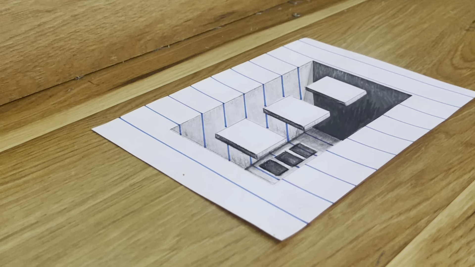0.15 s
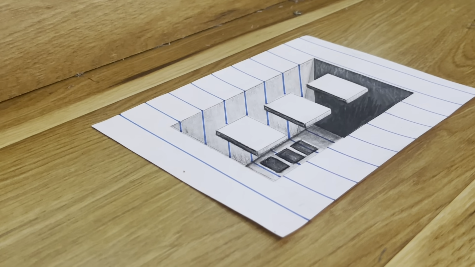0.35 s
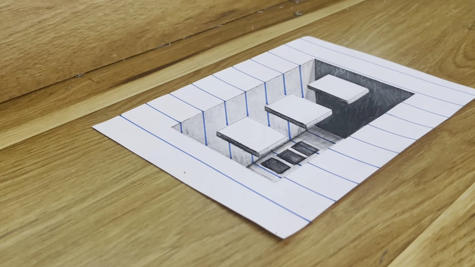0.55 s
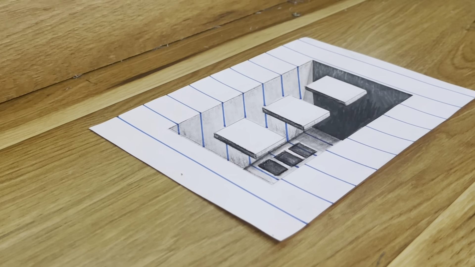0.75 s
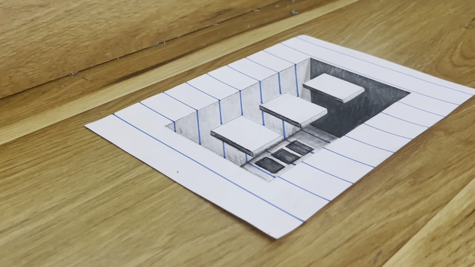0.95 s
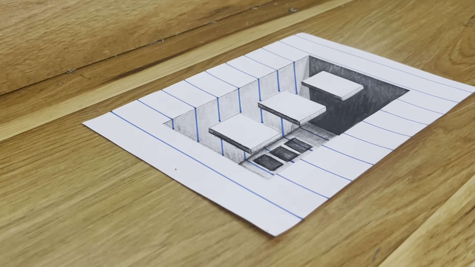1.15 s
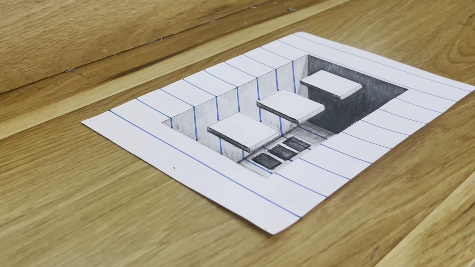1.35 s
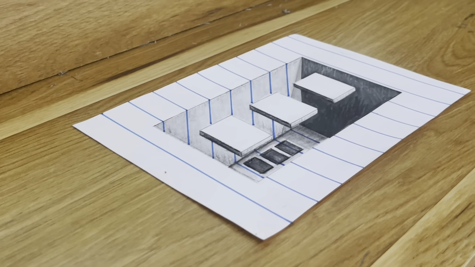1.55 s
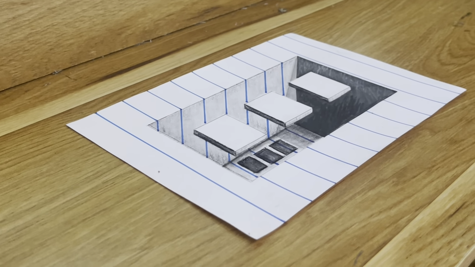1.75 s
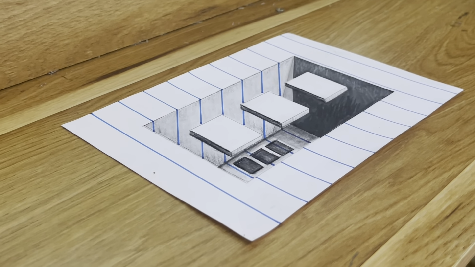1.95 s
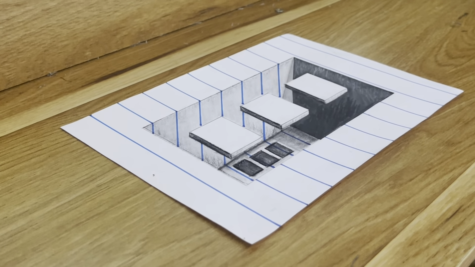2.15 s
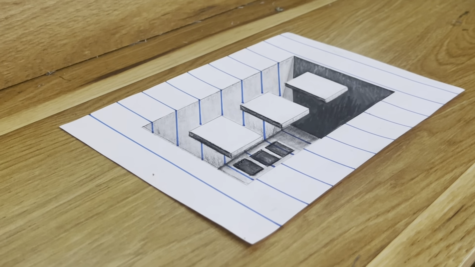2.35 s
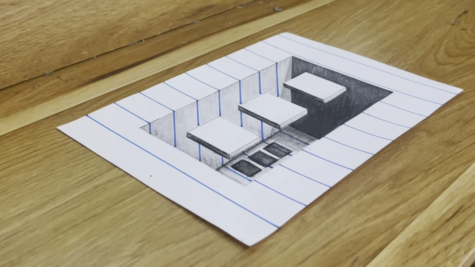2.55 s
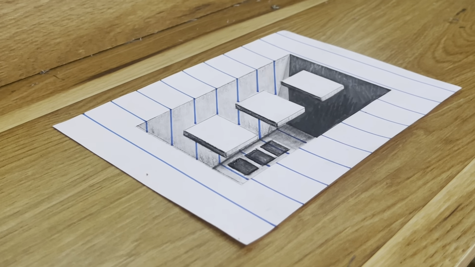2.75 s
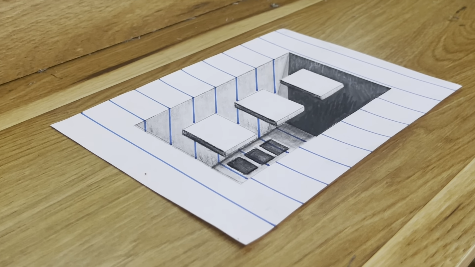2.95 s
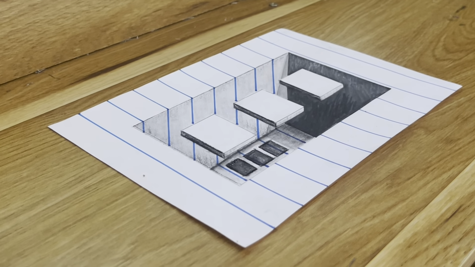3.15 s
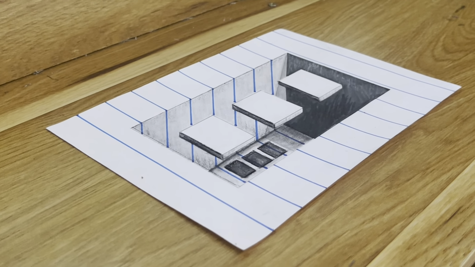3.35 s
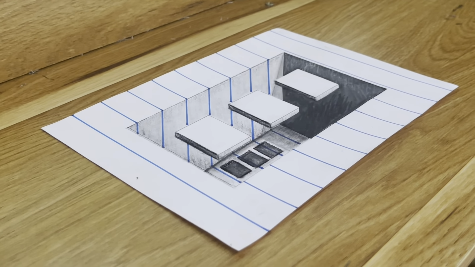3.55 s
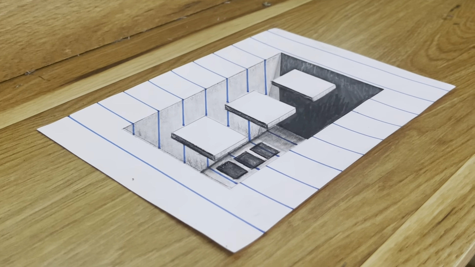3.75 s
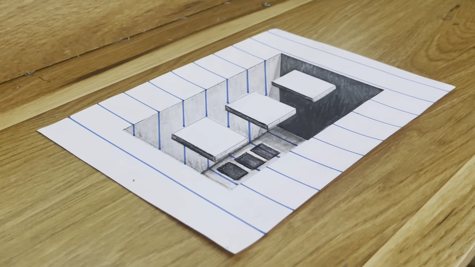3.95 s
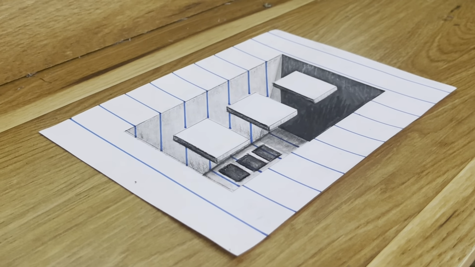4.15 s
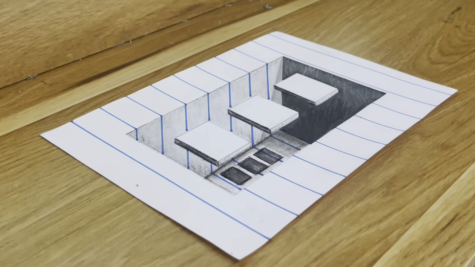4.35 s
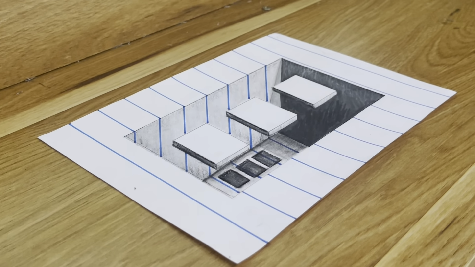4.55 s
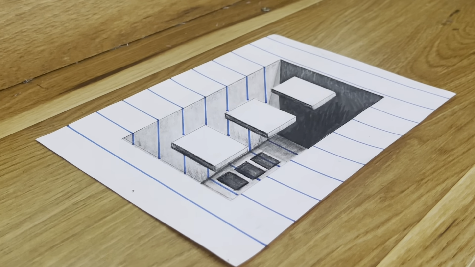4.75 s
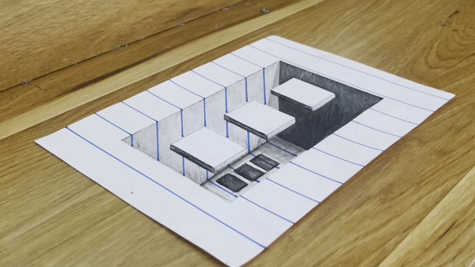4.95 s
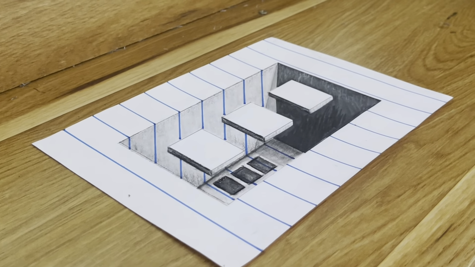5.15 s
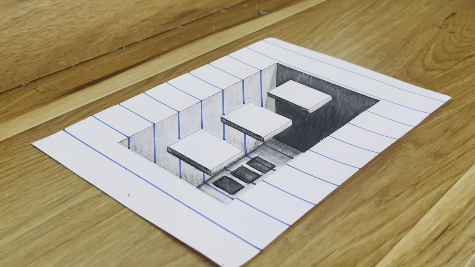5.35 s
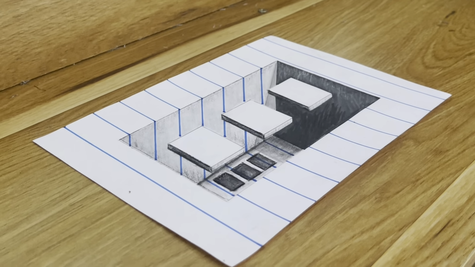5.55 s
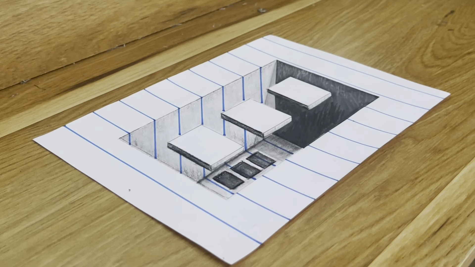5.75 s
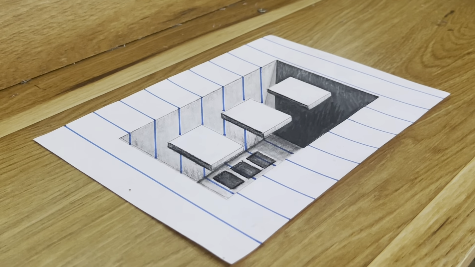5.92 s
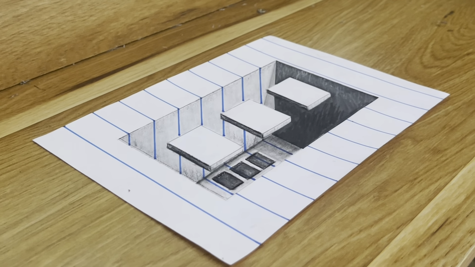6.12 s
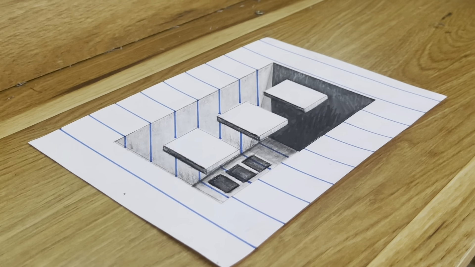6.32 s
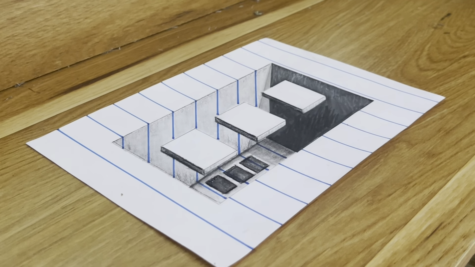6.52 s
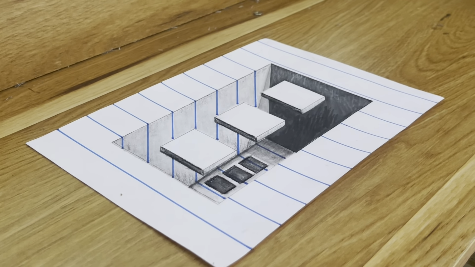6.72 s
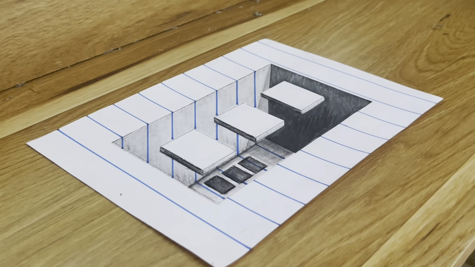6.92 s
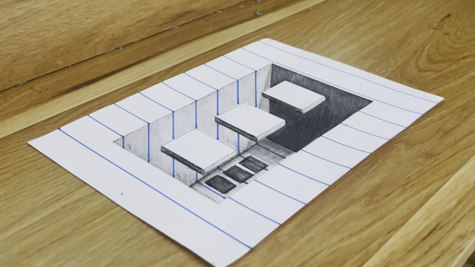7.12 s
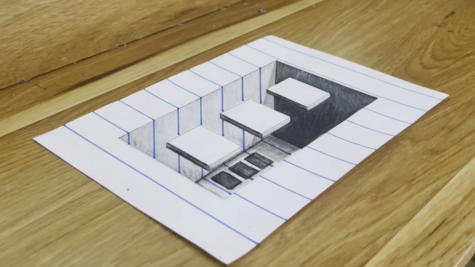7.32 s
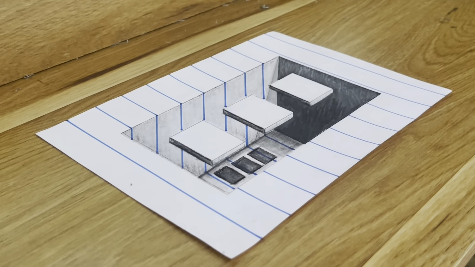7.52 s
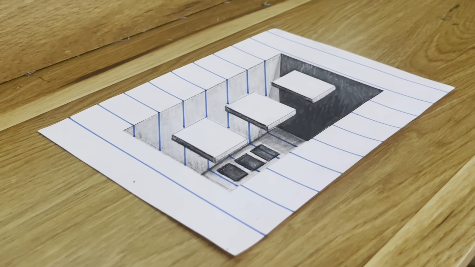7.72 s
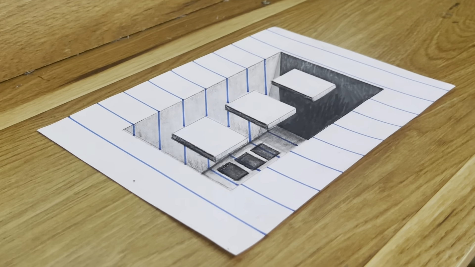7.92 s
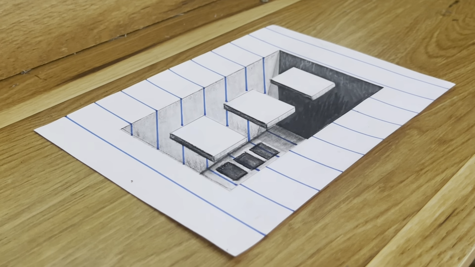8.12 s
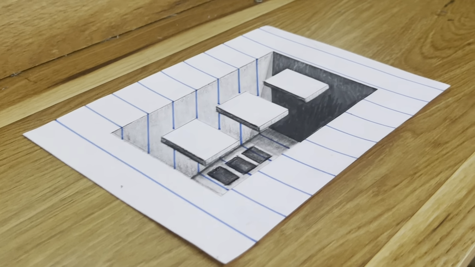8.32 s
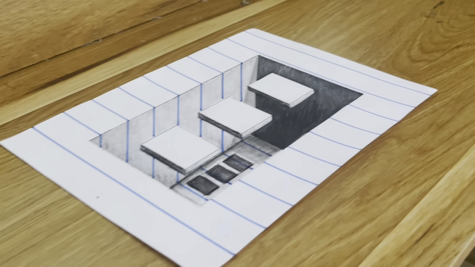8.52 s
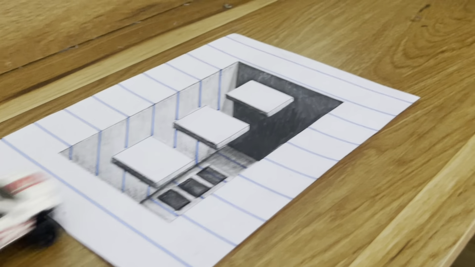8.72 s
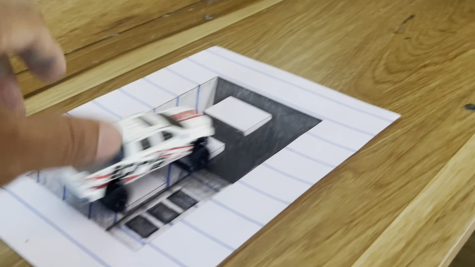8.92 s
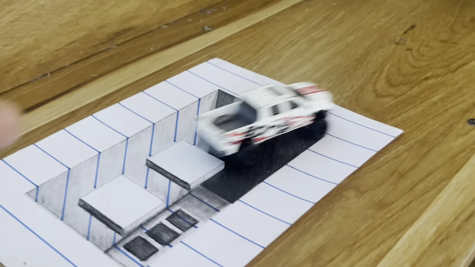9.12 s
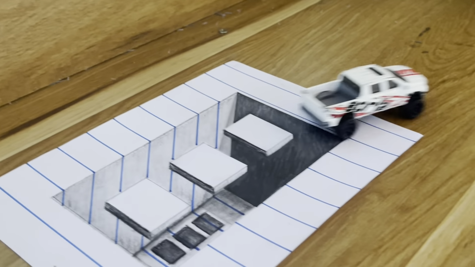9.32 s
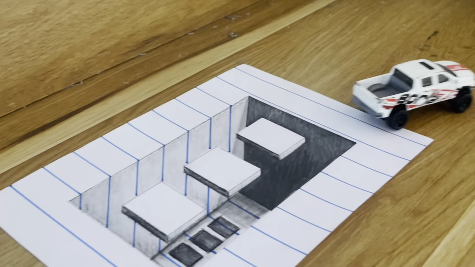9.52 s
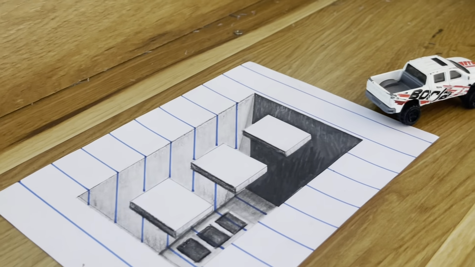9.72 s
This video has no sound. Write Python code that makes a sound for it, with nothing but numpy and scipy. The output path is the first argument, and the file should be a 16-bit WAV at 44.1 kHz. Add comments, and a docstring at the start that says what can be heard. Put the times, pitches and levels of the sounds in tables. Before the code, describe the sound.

Close stereo in a quiet, faintly humming room. After a near-silent start, a toy truck is rolled to and fro on a wooden table in short strokes: plastic whirr, axle ticks, hollow scuffs and soft low thumps. Strokes grow louder, with brief chirps, until one hard push releases the truck, which coasts ringing over paper, clatters onto wood and stops.

```python
"""A quiet room hums and hisses faintly throughout; both are shaped noise.
From 0.8 s a hand pushes a small toy truck to and fro over a wooden table, on the whole louder and louder.
Tiny bumps make its wheels whirr, its axles tick, and shaken modes of the table top drum; some wheels chirp or groan.
At 8.84 s the hand lets go: the truck coasts over paper, ringing freely, and leaves the paper at 9.24 s.
Near 9.6 s it stops and rings out faintly. The toy's shell colours its sound; all is heard close by in stereo."""
import sys
import numpy as np
from scipy import signal
from scipy.fft import rfft, irfft
from scipy.io import wavfile
from scipy.ndimage import uniform_filter1d

SR = 44100
rng = np.random.default_rng(int(sys.argv[2]) if len(sys.argv) > 2 else 0)


def to_wav(sig):
    """Store sig (one row per channel, or 1-D mono) as 16-bit WAV at the path in sys.argv[1].

    Samples outside -1..1 are clipped; the rate is SR.
    """
    pcm = np.clip(np.atleast_2d(sig), -1, 1) * 32767
    pcm = np.round(pcm).astype(np.int16)
    wavfile.write(sys.argv[1], SR, pcm.T)  # frames by channels


N = 435266
TIME, HZ = np.arange(N) / SR, np.fft.rfftfreq(N, 1 / SR)

# still room, shape of its noise: f/Hz, relative level per Hz/dB
HUSH = [(15, -29), (28, -20.5), (52, -3), (129, -9), (274, -25), (554, -28), (780, -35.5), (950, -43.5),
        (4100, -52), (12000, -52.5), (15000, -64.5)]
HUSH_DB = -64.5
# time for echoes to fall by 60 dB: f/Hz, t/s
ROOM_T60 = [(100, 0.63), (500, 0.35), (2000, 0.14), (6000, 0.13), (12000, 0.13)]
# clear knocks of wheels and loose axles: t/s, level/dB, hollow lows relative to level and before trim/dB,
#   bright snap relative to level/dB, pitch of the struck spot f/Hz
TICKS = [(0.793, -77, -1, -18, 2840), (0.8768, -67, -3, -8, 2060), (0.9337, -80, 9, -9.5, 1890),
         (1.0737, -62, -21, -20.5, 2050), (1.2463, -67, -24.5, -26, 1980), (1.336, -59, -25, -22, 1940),
         (1.345, -57.5, -24, -25, 2200), (1.377, -64, -20, -26, 1980), (1.422, -63, -16, -20, 1820),
         (1.4308, -58, -25, -26, 2040), (1.464, -56, -12, -20, 1980), (1.498, -66, -14, -18, 2050),
         (1.581, -57.5, -23, -21, 2180), (1.6714, -55, -11, -2, 2300), (1.7252, -57, -10, 4, 1580),
         (1.761, -51, -3, -4, 2100), (1.848, -57, -15, -24, 2150), (1.9, -54, -3, -14, 2150),
         (1.9876, -65, 7, -22, 2340), (2.1072, -58, -9, -13, 2070), (2.1296, -52, -10.0, 0.5, 1940),
         (2.226, -55.5, 2, -4, 2450), (2.362, -54, -2, -1.5, 2370), (2.5058, -71, 5, -8.0, 2260),
         (2.6214, -74, 8.5, -27, 1830), (2.755, -78, 6, -20, 1700), (2.7655, -76, 2, -18, 2430),
         (2.793, -70, -8.5, -17.0, 2240), (2.803, -65, -3, -5, 1670), (2.8643, -61.5, -7, 1.5, 6800),
         (2.9043, -63.5, -18, -4, 2480), (2.959, -68, -10, -9.0, 2430), (3.062, -57.5, -6, 1, 5600),
         (3.121, -56.5, 3, -1, 2450), (3.1385, -55, 0, 2.5, 5710), (3.1718, -48.5, -16, 3, 6900),
         (3.2112, -53, -5, -2, 2500), (3.3973, -59, -4, -2, 3190), (3.482, -52.5, -11, -3, 2500),
         (3.5527, -62, -10.5, -15, 2430), (3.6675, -60, -14, 4.5, 3190), (3.7047, -63, -11, -4, 2500),
         (3.73, -62.5, -21, -25, 2520), (3.813, -66.5, -15.5, -30.0, 2300), (3.904, -60, -5, -3, 3170),
         (4.0386, -65, 3, -21.5, 2280), (4.166, -57, -3, -26, 1870), (4.258, -61, -6, -10, 2520),
         (4.2964, -57, -4, -4, 2280), (4.3186, -54.5, -20, -0.5, 9300), (4.3434, -58.5, -3, -1, 2200),
         (4.382, -59, -6, 5.5, 7460), (4.3913, -53.5, -9, -6, 2370), (4.443, -60, -3, -1, 2500),
         (4.449, -66, -13, 9, 4970), (4.756, -55, -5, -2.5, 3270), (4.8365, -56.5, -16, -19, 3280),
         (4.8697, -56.5, -1.5, -2, 3550), (4.9098, -70.5, -7, 17, 8800), (4.9455, -59.5, 6.5, 4.5, 6750),
         (4.959, -58, 0, 0, 2620), (4.9776, -55, -12, -8, 2560), (5.0192, -55, -6, -5, 2420),
         (5.0574, -47.5, -3, -2, 2480), (5.0792, -67, -8, 17, 5560), (5.09, -46, -11, -0.5, 2690),
         (5.105, -54, -17, 4, 9000), (5.12, -48, -4, -7.0, 2690), (5.1287, -50.5, -3, 2, 2670),
         (5.148, -64, -10, 9, 5530), (5.171, -54.5, -5, -9, 2500), (5.1767, -48.5, -5.5, -7, 2180),
         (5.219, -60.5, -26, 5.5, 5430), (5.275, -61, -12, 0, 3230), (5.2779, -47.5, -17, 0, 5570),
         (5.329, -65, -12, 5, 9280), (5.351, -63, -5, 2, 3250), (5.375, -65, -14, 7, 7000),
         (5.4245, -54.5, 0, 2, 6700), (5.4545, -56, -7, 2, 5300), (5.4776, -59, -8, -1, 3250),
         (5.498, -52, -13, -10, 3600), (5.52, -51.5, -14, -2, 2500), (5.528, -49, -18, -5, 3250),
         (5.563, -49, -13, -1, 2330), (5.578, -45, -23, -6, 2380), (5.594, -39, -26, -11, 2330),
         (5.6108, -46.5, -26, -18.0, 2290), (5.6248, -46, -23.5, -11, 2350), (5.655, -51.5, -16, 0, 2400),
         (5.677, -55, -14, -9, 2400), (5.6858, -47.5, -21, -4, 2690), (5.7151, -55, -8, 5, 6240),
         (5.7306, -52.5, -3, -0.5, 3210), (5.7456, -48, -12, -17, 3280), (5.7646, -45.5, -13, -7, 3300),
         (5.8051, -60.5, -7.0, 0, 6800), (5.9088, -82, -14, -19.5, 2500), (5.9257, -54.5, -8, -8, 2350),
         (5.948, -50, -4, -2, 2000), (5.9573, -50, -2, -2, 2500), (5.993, -43.5, -9, 0, 3240),
         (6.008, -51.5, 0, 6, 8050), (6.018, -45.5, -10.5, -6, 3240), (6.079, -52, -15, 1, 2500),
         (6.102, -46, -12, 1, 5900), (6.118, -43, -25, -15, 3270), (6.138, -48.5, -17, 1, 3250),
         (6.146, -49, -14, -1, 2500), (6.165, -51, -16.0, 5, 3500), (6.1762, -43.5, -15, -7, 2370),
         (6.1907, -56, -10, 7.5, 7000), (6.212, -54, -17, -5, 2540), (6.2596, -62, -12, 3, 5710),
         (6.3142, -42.5, -8, -4.5, 3220), (6.348, -55, -8, -6, 2500), (6.368, -46.5, -6, 3, 2000),
         (6.401, -45.5, -5.5, -13, 3250), (6.4325, -47.5, -5, 2.5, 5700), (6.4734, -51, -14, -5, 2280),
         (6.506, -43.5, -7.5, -6.5, 2600), (6.539, -50, -14, 1, 3270), (6.5514, -48.5, -15, 10, 7750),
         (6.572, -52, -10, -2, 5600), (6.5814, -41, -15, 4.5, 9500), (6.597, -50, -12, 0, 5600),
         (6.6122, -43, -2.5, 6.5, 5600), (6.6255, -39, -4.5, -4, 2580), (6.642, -48, -12, 6, 9000),
         (6.6604, -37.5, -6.5, 1, 3120), (6.673, -56, -4.5, -3, 9400), (6.695, -40.5, -23, 4, 5550),
         (6.707, -53, -10, 8, 9100), (6.7263, -43.5, -10.0, 7.5, 5360), (6.743, -46.5, -2, 2, 7950),
         (6.763, -42, -7, -8, 2600), (6.769, -40, -13, 1.5, 7000), (6.781, -50, -15, 3, 9300),
         (6.8145, -44.5, -17, 4, 6000), (6.8263, -48, -12, -5, 2670), (6.8573, -50, -18, 6, 5840),
         (6.8693, -49.5, -3, -1, 2110), (6.9247, -49, -5.5, 5.0, 5600), (6.9573, -58.5, -3, 1, 3620),
         (6.9815, -63, -6, 5, 5900), (7.0746, -59.5, -8, 7, 5600), (7.1066, -82, -9, 19.5, 5860),
         (7.1287, -57, -8, -6, 2580), (7.1654, -46.5, -10, 0.5, 6830), (7.197, -45, -7, 2, 5740),
         (7.2233, -64, -3, 17.5, 7150), (7.241, -44, -10, 2, 3250), (7.2512, -39.5, -2.5, 0, 2720),
         (7.2966, -47, -10, -1, 3210), (7.387, -42.5, -5, -3, 2620), (7.4263, -42, -9, 1.5, 7900),
         (7.4428, -44.5, -9, -4, 2150), (7.4663, -41.5, -8, -7, 2580), (7.4969, -34.5, -9.5, -3.0, 3470),
         (7.5632, -41.5, -26, 1, 2370), (7.61, -41.5, -25, -22, 2350), (7.63, -47, -21, -5, 2400),
         (7.652, -39, -23, -6, 3210), (7.661, -57.5, -14, 16, 5750), (7.706, -45, -18, -3, 2150),
         (7.717, -47, -8, -17, 2300), (7.736, -42.5, -7, -16, 2330), (7.756, -45, -8, -8, 2390),
         (7.7757, -42, -2.5, -21, 2440), (7.8073, -39.5, -9.5, -18, 1880), (7.822, -42, -11, -5, 2380),
         (7.839, -41.5, -9, -18, 2090), (7.866, -46, -8, -21, 2560), (7.8946, -43.5, -2, -20, 2400),
         (7.91, -55, -9, -14, 2000), (7.9219, -51.5, -6, -20.5, 2020), (7.934, -60, -8, 0, 1870),
         (7.9653, -51.5, -1.5, -11, 2480), (8.0562, -55, -4, 1.5, 2160), (8.0673, -55, -12, -24, 2200),
         (8.081, -45.5, -9, 0, 2080), (8.1082, -46.5, -9.5, -11, 2490), (8.127, -44.5, -4, 2.5, 9050),
         (8.148, -45.5, 1, -3, 2500), (8.1682, -38.5, -6, -11, 1900), (8.1905, -37, -27, -5, 2450),
         (8.2326, -39, -10, -13, 2040), (8.2498, -38.5, -22.5, -6, 2000), (8.277, -36.5, -16, -10, 2430),
         (8.2892, -33, -19, -0.5, 3820), (8.337, -32, -21.5, -9, 3810), (8.3582, -33, -26, -3, 2360),
         (8.38, -36, -25, -18, 2430), (8.463, -34.5, -7.5, 1, 2070), (8.4922, -27.5, -14, -4, 2180),
         (8.51, -29, -14, -3, 2170), (8.5629, -30, -15.0, 1.5, 4860), (8.643, -29.5, -6, 0, 5800),
         (8.67, -32.5, -14, 5, 5640), (8.71, -26.5, -12, -6, 2400), (8.7244, -26, -16, -8, 5660),
         (8.7404, -36, -12, -9, 2560), (8.7974, -33.5, -16, -5, 2090), (8.815, -31.5, -2, -9, 2630),
         (8.8302, -34.5, -10, 2, 5560), (8.857, -40.5, -8.5, 12.5, 5600), (8.8835, -41.5, -13, 9, 8980),
         (8.929, -40.5, -11.5, 9, 7000), (8.9483, -50.5, 13.5, 15, 8890), (8.9824, -43, -10.5, 8, 8400),
         (9.009, -49, 8, 14, 5870), (9.0273, -50.5, 4, 19, 8750), (9.046, -42.5, 4.5, 5, 5650),
         (9.068, -42, -2, -19, 3170), (9.079, -42, 1, -19, 3210), (9.1228, -37.5, -4, 2, 7740),
         (9.146, -44.5, 1, 8.5, 6600), (9.1704, -36.5, -6, -12, 2050), (9.2063, -35, -4, -10, 1340),
         (9.2259, -38.5, -15, -2, 2360), (9.261, -37.5, -10, -4, 1380), (9.275, -32, -11, -5, 3080),
         (9.2847, -31.5, -8, -7, 3060), (9.296, -31.5, -14, -1, 2990), (9.3052, -33, -11.5, -0.5, 3060),
         (9.315, -33.5, -23, 2, 2970), (9.339, -35.5, -7, 0.5, 2970), (9.3545, -38, -15, 0, 3010),
         (9.3731, -40, -14, -10, 3010), (9.3896, -37, -24, -8, 1970), (9.4166, -51, -1, 1, 3210),
         (9.4528, -45, -11, -8, 1790), (9.469, -40.5, -6.0, -10, 3120), (9.484, -41.5, -12, -7, 3190),
         (9.522, -50, -7, -23, 2020), (9.534, -55.5, 4, -15, 3250), (9.5605, -60, 2, 9.5, 5870),
         (9.576, -54.5, -13, -3, 2090), (9.585, -44, -5, -14, 3230), (9.5943, -58.5, -4.0, 11.5, 5200),
         (9.629, -57, -3, -2, 2500)]
HOLLOW_KNOCK_TRIM_DB = -1
PING_HELD, PING_FREE = 0.04, 0.45  # share of a tick's bright energy that rings in the axle, 0-1
# steel axles: f/Hz, relative level before random changes/dB
AXLE_MODES = [(5650, -12), (5900, 7), (6400, 5.5), (6920, -8.5), (7700, -3.5), (8450, -5), (9100, 4.5),
              (11400, -6.5)]

# broad colour of the toy: f/Hz, relative level/dB
SHELL = [(200, -51), (450, 0.5), (620, -7.5), (900, -4), (1190, -6), (1450, -8.5), (1650, 4), (2500, 2),
         (3500, -2), (4400, -7.5), (6000, -8.5), (9000, 1), (11500, -1), (13000, -40)]
# its resonances, added to that colour: f/Hz, width/Hz, boost/dB
SHELL_MODES = [(689, 21, 4), (815, 93, 2), (1052, 69, 6.5), (1316, 72, 9.5), (1606, 9.2, 5.5),
               (2050, 58, 6.5), (2220, 230, 2.5), (2623, 330, 6), (2770, 90, -1), (3220, 176, 10),
               (3568, 75, 9), (4120, 130, -1), (5020, 390, 3.5), (5670, 800, 7.5), (6805, 260, 6.5),
               (8900, 250, -4.5)]
# the toy's tone by place and surface, each: f/Hz, change to the shell's colour/dB
FAR_TINT = [(450, -5), (690, 4.5), (820, -5.5), (925, 4.5), (1050, -9), (1160, -6.5), (1340, -4),
            (1600, 1.5), (3500, -3), (4300, 1), (6000, -3)]
NEAR_TINT = [(620, 0.5), (780, 2), (920, 3), (1070, 7), (1190, 0.5), (1340, 6), (2000, -2), (2500, 1),
             (4100, 1), (6000, 1.5)]
CLOSE_TINT = [(560, -3), (800, -2), (910, -3.5), (1150, 4), (1700, -1.5), (2500, 1), (3600, 0.5),
              (4150, 8.5), (5000, 3), (5700, 7), (7800, -5), (9500, -2)]
PAPER_TINT = [(560, 8), (800, -0.5), (1340, 8), (2200, 4), (2500, -0.5), (3000, 4.5), (4000, -6),
              (4900, -2.5), (6000, 5.5), (11500, 2)]
BEYOND_TINT = [(560, 0), (750, -3.5), (1050, -1), (1330, 5.5), (1700, -2.5), (2200, 1.5), (2650, -5),
               (2980, 4.5), (3250, -4.5), (3950, 4), (4400, 0), (4800, 7.5), (5600, -2), (6100, 3.5),
               (6400, 4.5), (6800, -1), (9500, -4.5)]  # bare wood beyond the paper

# the truck's weight lands on the table top as a stroke starts or turns: t/s, level before table trim/dB
THUMPS = [(0.795, -72), (0.99, -56), (2.10, -46.5), (2.362, -55), (2.696, -55.5), (3.035, -54),
          (3.215, -52), (4.02, -56), (5.09, -52), (5.175, -55), (6.439, -46.5), (6.51, -62), (6.87, -50),
          (6.96, -49), (7.245, -40.5), (7.385, -39), (7.905, -40), (8.084, -42)]
THUMP_RISE_S, THUMP_FALL_DB_PER_S = 0.0026, 228.5
# modes of the table top, each group: f/Hz, width to either side/Hz, relative level/dB
TABLE_DEEP = [(84, 10, -12), (118, 8, 4), (131, 18, -8)]
TABLE_SECOND = [(182, 19, 3), (207, 22, -7.5)]
TABLE_FAR = [(246, 26, -5), (283, 67, -10.5), (338.1, 13.7, 3), (370, 25.4, -4), (450, 305, -19.5)]
TABLE_NEAR = [(57, 16, -6.5), (243, 22, -7.5), (257, 22, 5), (285, 14, 3), (345.4, 16, 0.5), (387, 25, -5),
              (463.4, 14, -3), (508, 16, -7)]
TABLE_CLOSE = [(256.6, 8, -7.5), (285, 9.6, 0.5), (304.7, 9.3, -4), (334, 8.5, -8.5), (383, 34, -12.5),
               (465.6, 4.5, -14), (694, 12, -18)]
# where the truck is decides which modes it drives: t/s, place (0 far, 1 near, 2 close by; held to 0-2),
#   second table modes relative to the table/dB
PLACES = [(1.5, 0.029, -5.5), (4.4, 0.19, -3), (5.2, 1.48, -5), (5.7, 0.26, -5), (6.5, 1.21, -6),
          (7.5, 1.04, -7.5), (7.9, 0, -6.5), (8.3, 0, -4), (8.55, 1.55, -12), (8.75, 2.03, -27),
          (9.2, 1.94, -10), (9.35, 1.72, -4), (9.8, 1, 2)]

# strokes of the hand: start t/s, stop t/s, whirr before trim/dB, swell over the stroke/dB, level swings per s,
#   hollow lows and grit relative to the whirr/dB, table before trim/dB, deepest modes relative to the table/dB
STROKES = [(0.83, 1.07, -71.5, 22, 6, -11, -13.5, -68, -26),
           (1.183, 1.632, -59.5, 0.5, 4.5, -13.5, -18, -61.5, -22),
           (1.672, 1.915, -54.5, -5.5, 3.6, -6.5, -5, -59.5, -9),
           (1.961, 2.285, -57, 6.5, 5.6, -2, -7, -59, -10),
           (2.643, 3.04, -70, -1, 2.6, 0.5, -4.5, -63.5, -15),
           (3.073, 3.66, -59.5, 0.5, 3.2, -4, -2.5, -58.5, -8.5),
           (3.92, 4.198, -62.5, -4.5, 9, -3.5, -7, -65.5, -8),
           (4.318, 4.845, -62, 2, 11, -6, -3.5, -64.5, -8), (4.868, 5.14, -60.5, -3, 7, -6, -7, -60.5, -9),
           (5.362, 5.758, -55, 5, 1.9, -7.5, -4, -55.5, -12),
           (5.973, 6.446, -52.5, 0, 6.9, -9.5, -1.5, -53.5, -8.5),
           (6.512, 6.89, -57.5, -12, 2.3, -4.5, -5.5, -50, -7.5),
           (7.242, 7.916, -48.5, 1, 5.44, -7, -2.5, -48.5, -12)]
ATTACK_DB_PER_S, STOP_DB_PER_S = 231, 244
TABLE_ATTACK_DB_PER_S, TABLE_STOP_DB_PER_S = 183, 141
WOBBLE_DB = 1.3  # the whirr swells and sinks a little within each stroke
TABLE_FOLLOWS = 0.22  # share of the wheels' swells, in dB, that reaches the table top
GRIT_FADES, GRIT_FADE_MOST_DB = 0.52, 6  # grit loses this further share of the whirr's fall in dB, up to a limit
# brief rises and dips as the wheels dig in or cross an edge: t/s, change/dB
SURGES = [(1.0, 7), (1.3, 8), (1.46, 1.5), (1.881, 9.5), (2.121, 12), (3.16, 0.5), (4.03, 7), (4.17, 3),
          (5.11, -6), (5.605, 6), (6.0, 0.5), (6.119, 5), (6.3, 3.5), (7.585, 5), (7.83, 5.5), (8.475, -2),
          (8.563, 6.5), (8.647, 5.5), (8.732, 3.5), (8.819, -2)]
SURGE_S, SURGE_GRIT = 0.025, 0.41  # half the length; further share of the change, in dB, added to the grit
RESTING_WHIRR_DB, RESTING_TABLE_DB = -84, -78.5  # the held truck never lies quite still (before trim)
DEEP_FALL_DB_PER_S = 102  # the deepest modes fall no faster than this
BUMP_SPEED_LAW, BUMP_USUAL_DB = 0.33, -50  # above the usual whirr, bumps crowd by this share of the excess in dB
# a wheel scuffs hollowly: t/s, share of the whirr's energy (held to 0-1), f/Hz before drift
SCUFF = [(.9, 0.73, 2060), (1.3, 0.87, 2056), (1.7, 0.7, 2270), (4.3, 0, 2500), (7.6, 0.3, 2470),
         (7.85, 0.5, 2060), (8.66, 0.09, 2690), (8.85, 0.17, 3200)]
WHEELS_TRIM_DB, TABLE_TRIM_DB = -4, 0.85

# a wheel sticks and slips: t/s, peak before trim/dB, f/Hz before waver, time to swell/s
SLIPS = [(1.496, -56, 1090, 0.0022), (2.687, -51, 3120, .004), (2.701, -50, 3200, 0.0044),
         (2.792, -56, 2000, .004), (3.829, -52, 2490, 0.0055), (4.064, -37.5, 2400, .002),
         (4.186, -43.5, 1730, .0017), (5.402, -43, 2620, .0017), (7.332, -30, 3220, 0.0021),
         (7.3814, -30, 2540, .0012), (7.482, -32, 2620, .0017), (7.5802, -25, 2380, 0.0013),
         (7.5937, -29, 1730, 0.0018), (7.6904, -30, 3320, .0017), (8.338, -26, 4000, .0015),
         (8.357, -27, 5100, .0015), (8.382, -23, 2800, .0015)]
SLIP_TRIM_DB = -5
# pressed down hard, the truck groans: f/Hz, width to either side/Hz, level relative to the untrimmed whirr/dB
GROAN_MODES = [(938, 34, -17), (1044, 46, -15.5), (1330, 49, -10), (2150, 97, -12)]
GROAN_FROM_S, GROAN_TO_S = 1.68, 2.37

# last push and free roll: t/s, whirr before trim/dB, hollow lows and grit relative to the whirr/dB,
#   table before trim/dB, deepest modes relative to the table/dB
LAUNCH = [(8.03, -70, -2, -12, -62, -10), (8.17, -40, -6.5, -5.5, -44.5, -13),
          (8.4, -31.5, -11.5, -3, -45.5, -10.5), (8.58, -29, -8.5, -5, -37.5, -15.5),
          (8.829, -28, -4, 2, -32.5, -2), (8.849, -41, -0.5, 5, -26.5, -15),
          (9.02, -46.5, 1.5, 0.5, -36.5, -1), (9.2, -41, -5.5, -4, -40.5, -2),
          (9.25, -46.5, -2, -3, -40, -6), (9.37, -41.5, -8, -5, -51, 7.5), (9.44, -53.5, -2, -3, -54, 12),
          (9.601, -61.5, 3, -3, -54.5, 6), (9.67, -77, -3, -2, -67, -4), (9.78, -83, 3, -5.5, -70, 9.5)]
LET_GO_S, OFF_PAPER_S = 8.84, 9.24  # between these the truck coasts on the paper
# running free, the truck rings: f/Hz, width to either side/Hz, level relative to the untrimmed whirr/dB
FREE_MODES = [(3170, 135, -19.5), (5630, 220, -26.5)]
FREE_FALL_DB_PER_S = 150
# faint ringing of the stopped truck: f/Hz, width to either side/Hz, starting level/dB
SETTLE_MODES = [(3270, 45, -73), (5480, 110, -71.5)]
SETTLE_S, SETTLE_FALL_DB_PER_S = 9.595, 125

# level between the channels: f/Hz, left minus right/dB
LEFT_DB = [(60, 2), (140, 4), (310, 2.5), (700, 5.5), (1100, 4), (1580, 5.5), (2300, -1), (12000, 1)]
# phase between the channels: f/Hz, left ahead of right/rad
LEFT_LEAD = [(0, 0), (1380, 0.4), (1640, -0.9), (2070, -0.1), (2840, 0.6), (4910, 0.5), (6630, -0.0),
             (7490, 0.1), (8010, 0.5), (8790, -0.2), (9300, -1.7), (10700, -3.8), (11700, -6.1),
             (12300, -6.4)]
EDGE_HZ = 12450  # treble limit


def amp(db):
    """Turns decibels into gain."""
    return 10 ** (np.asarray(db) / 20)


def unit(x):
    """Scales to rms 1."""
    return x / np.sqrt(np.mean(x ** 2) + 1e-20)


def read(points, hz):
    """Reads a table of frequencies, spacing them by their logarithm."""
    f, value = np.transpose(points)
    return np.interp(np.log(hz + 1), np.log(f + 1), value)


def curves(rows):
    """Draws each column of a table of times as a line through every sample."""
    s, *columns = np.transpose(rows)
    return [np.interp(TIME, s, column) for column in columns]


def wander(rate_hz):
    """Smooth random motion of rms 1; changes faster than rate_hz fade away."""
    smoothing = np.sqrt(1 + (HZ / rate_hz) ** 4)
    return unit(irfft(rfft(rng.standard_normal(N)) / smoothing, N))


def split(x, hz):
    """Splits x softly into the parts below and above hz."""
    low = irfft(rfft(x) / (1 + (HZ / hz) ** 8), N)
    return low, x - low


def add(mix, s, sound):
    """Lays a sound into the mix at time s."""
    part = mix[round(s * SR):][:len(sound)]
    part += sound[:len(part)]


def together(*gains):
    """Level in dB of unrelated sounds: their energies add up."""
    return 10 * np.log10(sum(gain ** 2 for gain in gains) + 1e-14)


def place_shares(count=3):
    """Fades between far, near and close by as the truck's place changes."""
    place = np.clip(curves(PLACES)[0], 0, 2)
    return [np.maximum(1 - abs(place - k), 0) for k in range(count)]


def hush(apart_db=-13):
    """The room's low rumble and faint hiss: shaped noise, mostly shared by both channels."""
    noise = rng.standard_normal(N) + amp(apart_db) * rng.standard_normal((2, N))
    return amp(HUSH_DB) * unit(irfft(rfft(noise) * amp(read(HUSH, HZ)), N))


def shell(x):
    """Rings x through the toy: its colour and resonances as a filter that only sounds after the blow."""
    size = 4096
    hz = np.fft.rfftfreq(size, 1 / SR)
    db = read(SHELL, hz)
    db = db + sum(boost / (1 + (2 * (hz - f) / width) ** 2) for f, width, boost in SHELL_MODES)
    log_gain = np.log(amp(np.r_[db, db[-2:0:-1]]))
    # the Hilbert transform finds the phase that puts the energy as early as possible
    ring = np.fft.ifft(np.exp(np.conj(signal.hilbert(log_gain)))).real[:size // 2]
    return signal.oaconvolve(x, ring / np.linalg.norm(ring))[:N]


def rattle(t60, colour_db, rise_s=0.00028, bounce_db=-5):
    """One knock, energy 1: a quickly dying chatter and a bounce, coloured at random by the struck spot."""
    t = TIME[:SR // 20]
    fall = (1 - np.exp(-t / rise_s)) * amp(-60 * t / t60)
    bounce = amp(bounce_db) * np.interp(t - rng.uniform(0.0005, 0.0065), t, fall, left=0)
    hz = np.fft.rfftfreq(len(t), 1 / SR)
    colour = np.interp(hz, np.linspace(0, SR / 2, 48), rng.standard_normal(48))
    noise = irfft(rfft(rng.standard_normal(len(t))) * amp(colour_db * colour), len(t))
    burst = noise * np.hypot(fall, bounce)
    return burst / np.linalg.norm(burst)


def spot(x, hz, width, boost_db):
    """The struck spot of the shell rings briefly at its own pitch."""
    return x + amp(boost_db) * signal.lfilter(*signal.iirpeak(hz, hz / width, SR), x)


def ping(t60=0.025):
    """An axle rings, energy 1; every knock shares itself out differently among the modes."""
    t = TIME[:SR // 20]
    hz, db = np.transpose(AXLE_MODES)[:, :, None]
    strength, detune, phase = rng.standard_normal((3, len(hz), 1))
    turns = hz * (1 + 0.03 * detune) * t + phase
    ring = (amp(db + 4 * strength) * np.sin(2 * np.pi * turns)).sum(0)
    ring *= (1 - np.exp(-t / 0.0008)) * amp(-60 * t / t60)
    return ring / np.linalg.norm(ring)


def axles():
    """Knocks snap the plastic and ping the axles, most when free; the shell's hollow rings a little longer."""
    out = np.zeros(N)
    length = np.sqrt(SR * 0.008)  # turns energy 1 into rms 1 over 8 ms
    edges = (400, 1500), (1400, 3900), (4100, 12600)
    bands = [signal.butter(3, edge, "band", fs=SR, output="sos") for edge in edges]
    for s, db, low_db, bright_db, hz in TICKS:
        loose = PING_FREE if LET_GO_S < s < OFF_PAPER_S else PING_HELD
        snap = shell(rattle(t60=0.017, colour_db=1.5, rise_s=0.00063, bounce_db=-7.5))
        snap = spot(snap, hz, width=260, boost_db=3)
        knock = shell(rattle(t60=0.022, colour_db=-0.5, rise_s=0.00029))
        parts = [signal.sosfilt(band, x) for band, x in zip(bands, (knock, snap, snap))]
        low, middle, keen = [x / np.linalg.norm(x) for x in parts]
        size, bright = length * amp(db), amp(bright_db)
        low_gain = amp(low_db + HOLLOW_KNOCK_TRIM_DB)
        add(out, s, size * (low_gain * low + middle + bright * np.sqrt(1 - loose) * keen))
        add(out, s, size * bright * np.sqrt(loose) * ping())
    return out


def thumps(t):
    """Each thump quickly shakes the table top and dies away: a gain at the times t."""
    ages = [(np.maximum(t - s, 0), db) for s, db in THUMPS]
    return sum(np.minimum(age / THUMP_RISE_S, 1) * amp(db - THUMP_FALL_DB_PER_S * age) for age, db in ages)


def drum(modes):
    """Random jolts ring a group of modes, rms 1."""
    jolts = rng.standard_normal(N) * amp(2.0 * wander(60))
    power = sum(amp(db) ** 2 / (1 + ((HZ - f) / width) ** 2) ** 2 for f, width, db in modes)
    return unit(irfft(rfft(jolts) * np.sqrt(power), N))


def table(level_db, deep_db):
    """The table top drums under the wheels; which modes sound depends on where the truck is."""
    second_db = curves(PLACES)[1]
    groups = TABLE_FAR, TABLE_NEAR, TABLE_CLOSE
    upper = sum(np.sqrt(share) * drum(modes) for share, modes in zip(place_shares(), groups))
    second = amp(second_db) * drum(TABLE_SECOND)
    return amp(level_db) * (upper + second) + amp(deep_db) * drum(TABLE_DEEP)


def motion():
    """The rolling truck's whirr, hollow, grit, table and deep levels in dB; the strongest stroke rules."""
    t = TIME[::32]
    s, *columns = np.transpose(LAUNCH)
    whirr, hollow, grit, wood, deep = [np.interp(t, s, column) for column in columns]
    early, late = np.maximum(s[0] - t, 0), np.maximum(t - s[-1], 0)
    whirr = whirr - ATTACK_DB_PER_S * early - STOP_DB_PER_S * late
    wood = wood - TABLE_ATTACK_DB_PER_S * early - TABLE_STOP_DB_PER_S * late
    wheel, top = np.array([whirr, hollow, grit]), np.array([wood, deep])
    for start, stop, db, swell_db, swings_per_s, hollow_db, grit_db, table_db, deep_db in STROKES:
        early, late = np.maximum(start - t, 0), np.maximum(t - stop, 0)
        swell = swell_db * np.interp(t, [start, stop], [-0.5, 0.5])
        swell = swell + WOBBLE_DB * np.sin(2 * np.pi * swings_per_s * (t - start))
        fading = ATTACK_DB_PER_S * early + STOP_DB_PER_S * late
        whirr = db + swell - fading
        grit = grit_db - np.minimum(GRIT_FADES * fading, GRIT_FADE_MOST_DB)
        wood_fading = TABLE_ATTACK_DB_PER_S * early + TABLE_STOP_DB_PER_S * late
        wood = table_db + TABLE_FOLLOWS * swell - wood_fading
        wheel = np.where(whirr > wheel[0], np.broadcast_arrays(whirr, hollow_db, grit), wheel)
        top = np.where(wood > top[0], np.broadcast_arrays(wood, deep_db), top)
    surge = sum(db * np.exp(-((t - s) / SURGE_S) ** 2) for s, db in SURGES)
    held = (t > STROKES[0][0]) & (t < LET_GO_S)
    whirr = together(amp(wheel[0] + surge), held * amp(RESTING_WHIRR_DB))
    wood = together(amp(top[0] + TABLE_FOLLOWS * surge), held * amp(RESTING_TABLE_DB), thumps(t))
    # the running maximum of a tilted curve limits how fast the deep level can fall
    fall = DEEP_FALL_DB_PER_S * t
    deep = np.maximum.accumulate(wood + top[1] + fall) - fall
    levels = whirr, wheel[1], wheel[2] + SURGE_GRIT * surge, wood, deep
    return [np.interp(TIME, t, uniform_filter1d(level, size=8)) for level in levels]


def shifting(x, depth_db=2.0):
    """As the wheels turn, the load moves about the toy: narrow resonances come and go."""
    z = signal.stft(x, nperseg=512, noverlap=384)[2]
    patches = uniform_filter1d(rng.standard_normal(z.shape), size=3, axis=0)  # across frequency
    patches = uniform_filter1d(patches, size=14, axis=1)  # across time
    return unit(signal.istft(z * amp(depth_db * unit(patches)), nperseg=512, noverlap=384)[1][:N])


def wheels(level_db, hollow_db, grit_db, bumps_per_s=330, kinds=24):
    """Tiny bumps of the surface set the wheels chattering over a smooth rub."""
    crowding = np.clip(amp(BUMP_SPEED_LAW * (level_db - BUMP_USUAL_DB)), 1, 8)
    sizes = amp(3.0 * np.minimum(rng.exponential(1, N), 3))
    bumps = sizes * (rng.random(N) < crowding * bumps_per_s / SR) / np.sqrt(crowding)
    knocks = [rattle(t60=0.023, colour_db=4.0, rise_s=0.0014, bounce_db=-11.0) for _ in range(kinds)]
    kind, chatter = rng.integers(0, kinds, N), np.zeros(N)
    for at in np.flatnonzero(bumps):
        add(chatter, at / SR, bumps[at] * knocks[kind[at]])
    contact = unit(chatter) + amp(-12) * rng.standard_normal(N)  # chatter and rub
    hollow, rest = split(shifting(shell(contact)), hz=1630)
    whirr, grit = split(rest, hz=3840)
    share, scuff_hz = curves(SCUFF)
    share = np.clip(share, 0, 1)
    whirr = np.sqrt(1 - share) * unit(whirr) + np.sqrt(share) * scuff(scuff_hz)
    # a light touch loses the finest grit first
    coarse, fine = split(grit, hz=6650)
    sharpness = amp(np.clip(grit_db + 4.5, -12, 4))
    grit = (unit(coarse) + sharpness * unit(fine)) / np.hypot(1, sharpness)
    return amp(level_db) * (whirr + amp(hollow_db) * unit(hollow) + amp(grit_db) * grit)


def resonate(x, hz, width):
    """A resonance whose pitch follows the curve hz."""
    turn, r = np.exp(2j * np.pi * np.cumsum(hz) / SR), np.exp(-np.pi * width / SR)
    # shift the pitch down to zero, smooth there, and shift back
    return (turn * signal.lfilter([(1 - r) ** 2], [1, -2 * r, r * r], x / turn)).real


def scuff(pitch_hz):
    """A wheel drags sideways: uneven slips in a hollow, drifting resonance, with two weaker ones above it."""
    drag = rng.standard_normal(N) * amp(3.2 * wander(70))
    upper = amp(-12) * resonate(drag, 1.65 * pitch_hz, width=340)
    rasp = amp(-20) * resonate(drag, 2.52 * pitch_hz, width=1300)
    return unit(resonate(drag, pitch_hz * (1 + 0.027 * wander(18)), width=305) + upper + rasp)


def tinted(x):
    """Blends the colours of the truck's place: far, near, close by, on the paper, or beyond it."""
    free, beyond = [uniform_filter1d(1. * (TIME > s), size=SR // 100) for s in (LET_GO_S, OFF_PAPER_S)]
    shares = [(1 - free) * share for share in place_shares()] + [free - beyond, beyond]
    tints = FAR_TINT, NEAR_TINT, CLOSE_TINT, PAPER_TINT, BEYOND_TINT
    spectrum = rfft(x)
    return sum(share * irfft(spectrum * amp(read(tint, HZ)), N) for share, tint in zip(shares, tints))


def slips(waver=0.065):
    """A wheel breaks loose for a moment: a short, unsteady chirp."""
    t, out = TIME[:SR // 20], np.zeros(N)
    for s, db, hz, swell_s in SLIPS:
        unsteady = unit(uniform_filter1d(rng.standard_normal(len(t)), SR // 500))
        pitch = hz * (1 + waver * unsteady)
        swell = t / swell_s * np.exp(1 - t / swell_s)  # rises to 1, then dies away
        add(out, s, amp(db + SLIP_TRIM_DB) * swell * np.sin(2 * np.pi * np.cumsum(pitch) / SR))
    return out


def groaning(whirr_db):
    """A wheel pressed hard into the wood sings hollowly while it rolls."""
    pressed = uniform_filter1d(1. * (TIME > GROAN_FROM_S) * (TIME < GROAN_TO_S), size=SR // 30)
    ring = sum(amp(db) * drum([(hz, width, 0)]) for hz, width, db in GROAN_MODES)
    return pressed * amp(whirr_db + 3.0 * wander(11)) * ring


def coasting(whirr_db):
    """With no fingers to damp it, the jolted truck rings in a few narrow modes, which outlast the roll."""
    ring = sum(amp(db) * drum([(hz, width, 0)]) * unit(amp(4.6 * wander(25))) for hz, width, db in FREE_MODES)
    fall = FREE_FALL_DB_PER_S * TIME
    level_db = np.maximum.accumulate(whirr_db + fall) - fall
    fade_in = np.clip((TIME - LET_GO_S) / 0.041, 0, 1)
    return fade_in * amp(level_db) * ring


def settling():
    """The truck has stopped; its body and axles ring out."""
    age = np.maximum(TIME - SETTLE_S, 0)
    ring = sum(amp(db) * drum([(hz, width, 0)]) for hz, width, db in SETTLE_MODES)
    return (age > 0) * amp(-SETTLE_FALL_DB_PER_S * age) * ring


def room(x):
    """Scattered echoes, different in each channel, dying sooner in the treble."""
    hz, t, z = signal.stft(rng.standard_normal((2, SR // 2)), SR, nperseg=256)
    tail = signal.istft(z * amp(-60 * t / read(ROOM_T60, hz)[:, None]), SR, nperseg=256)[1]
    tail[:, :SR // 250] = 0  # no echo in the first 4 ms
    return signal.fftconvolve(x[None], tail / np.linalg.norm(tail[0]), axes=1)[:, :N]


def scene():
    """Truck and table, direct and through the room; the truck's lower part spreads round the room most."""
    whirr_db, hollow_db, grit_db, table_db, deep_db = motion()
    knocks, beyond = axles(), TIME > OFF_PAPER_S
    rolling = amp(WHEELS_TRIM_DB) * wheels(whirr_db, hollow_db, grit_db)
    # only the knocks beyond the paper take on the colour of the place
    truck = tinted(rolling + beyond * knocks) + ~beyond * knocks
    truck = truck + slips() + groaning(whirr_db) + coasting(whirr_db) + settling()
    wood = amp(TABLE_TRIM_DB) * table(table_db, deep_db)
    hollow, crisp = split(truck, hz=1840)
    spread = amp(-5.5) * hollow + amp(-12.5) * crisp
    boom = amp(-17) * wood
    return truck + wood + room(spread + boom) + hush()


def record(dry):
    """The two channels differ in level and phase; then the treble is cut off."""
    half = amp(read(LEFT_DB, HZ) / 2) * np.exp(0.5j * read(LEFT_LEAD, HZ))
    pair = irfft(rfft(dry) * np.array([half, 1 / half]), N)
    treble_cut = signal.firwin(255, EDGE_HZ, window=("kaiser", 9), fs=SR)
    return signal.oaconvolve(pair, treble_cut[None], "same")


dry = scene()
out = record(dry)
to_wav(out)
```